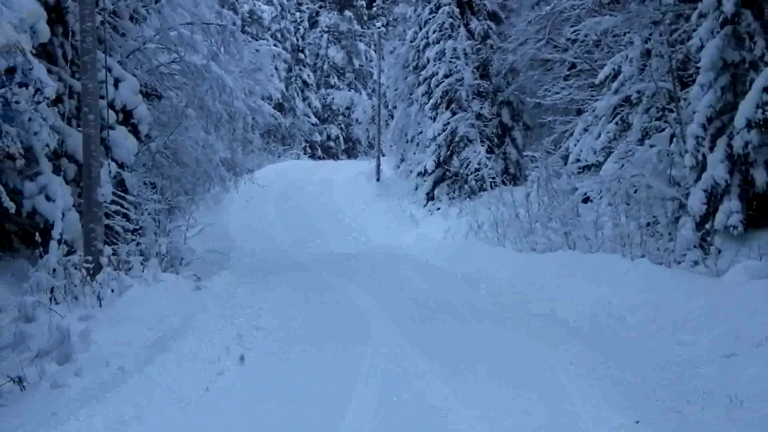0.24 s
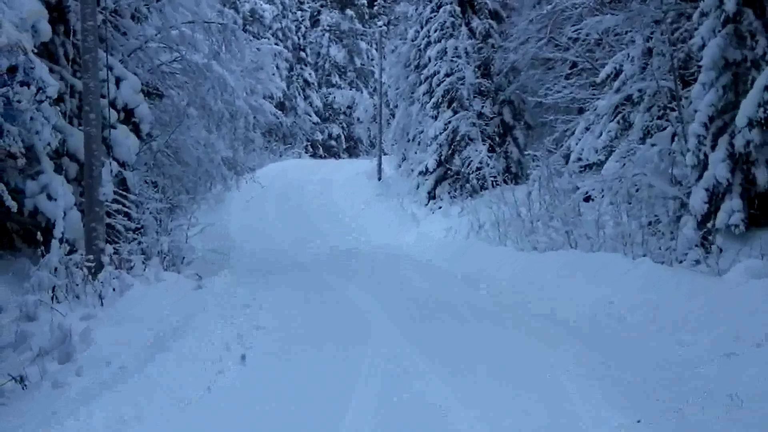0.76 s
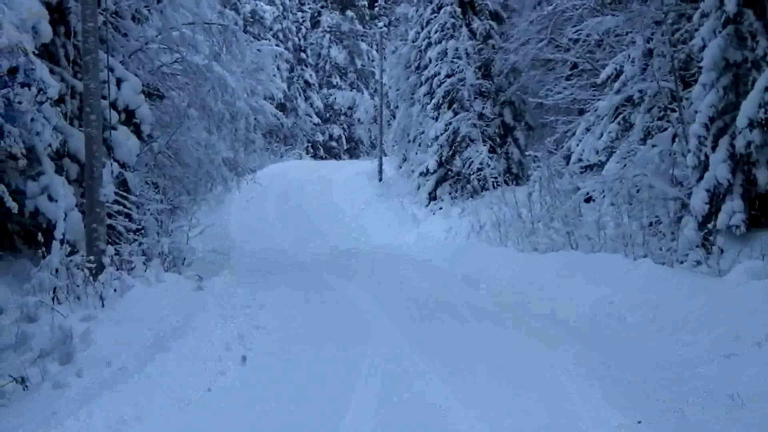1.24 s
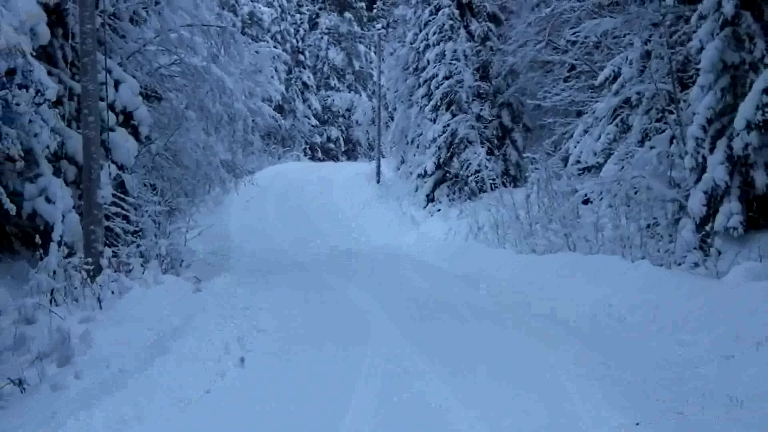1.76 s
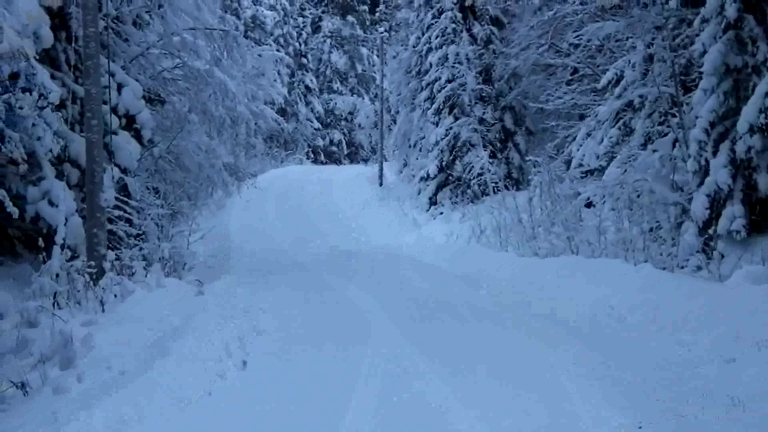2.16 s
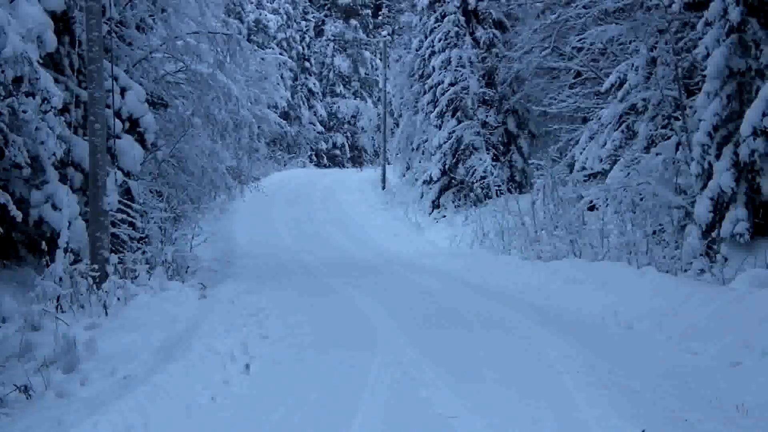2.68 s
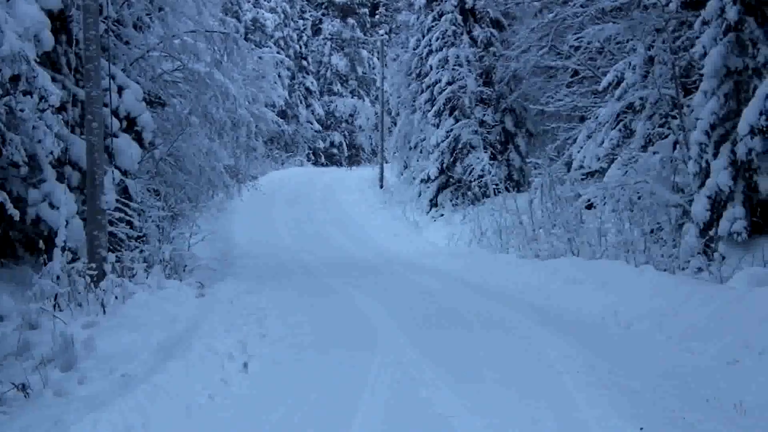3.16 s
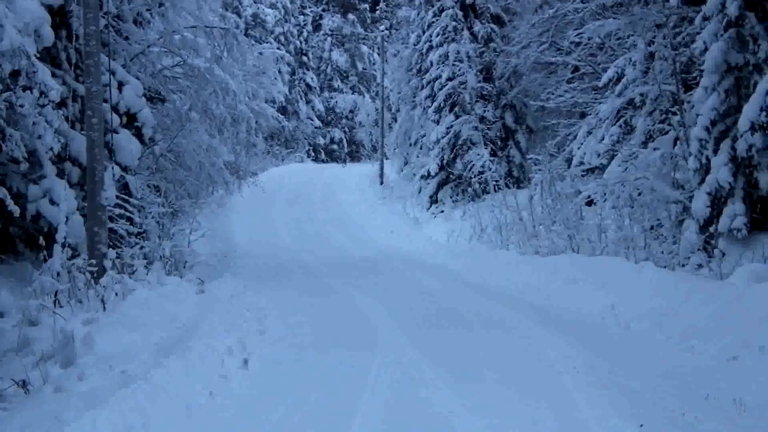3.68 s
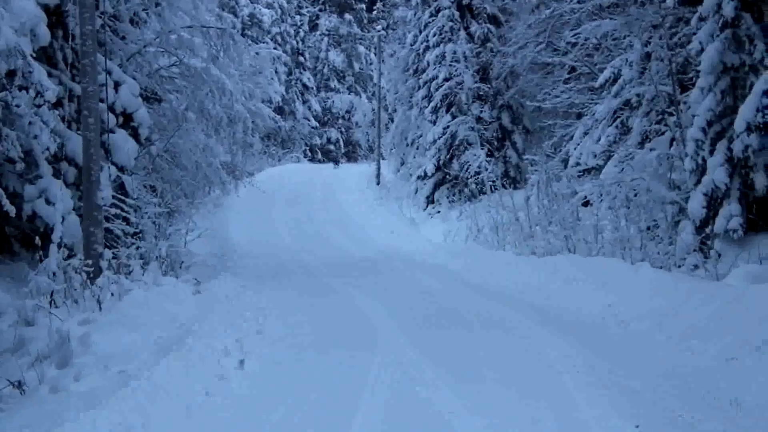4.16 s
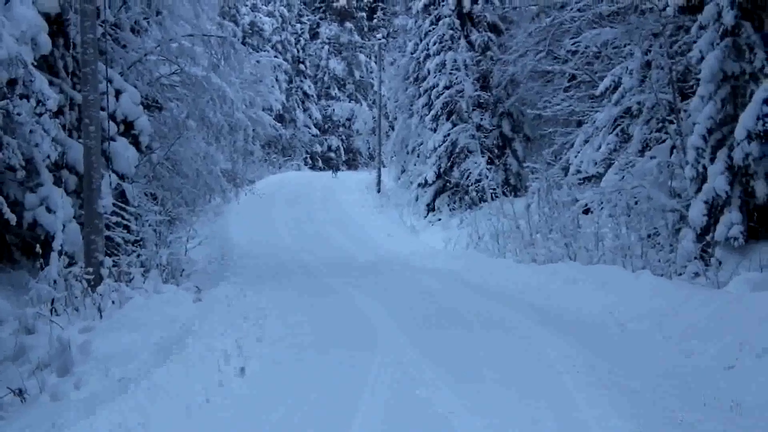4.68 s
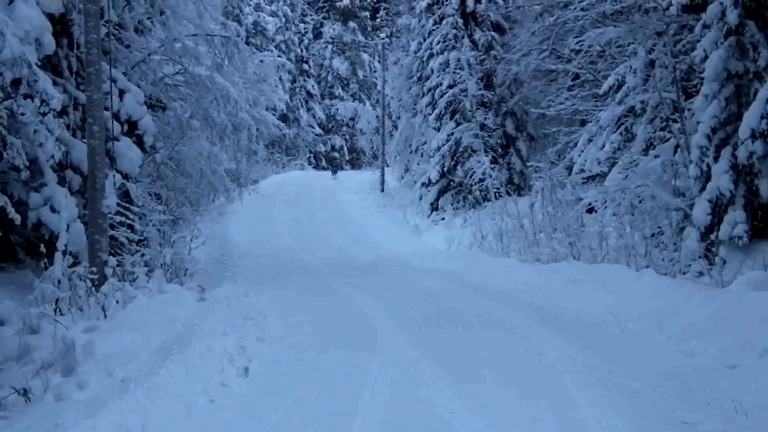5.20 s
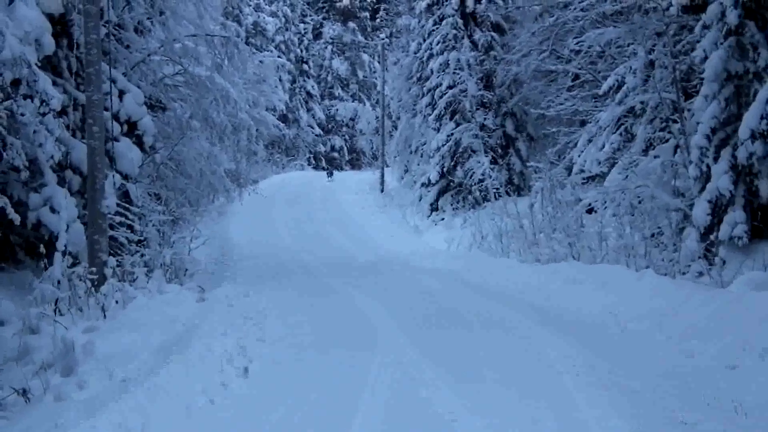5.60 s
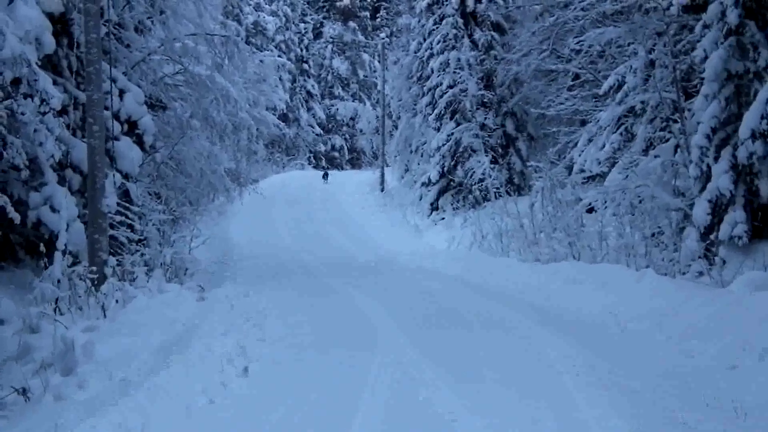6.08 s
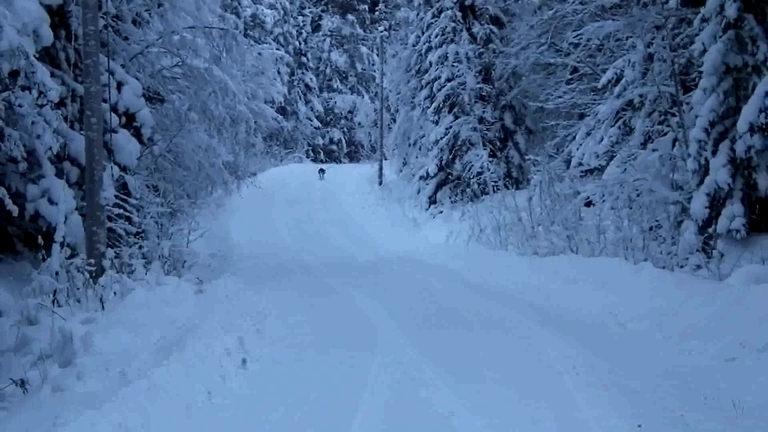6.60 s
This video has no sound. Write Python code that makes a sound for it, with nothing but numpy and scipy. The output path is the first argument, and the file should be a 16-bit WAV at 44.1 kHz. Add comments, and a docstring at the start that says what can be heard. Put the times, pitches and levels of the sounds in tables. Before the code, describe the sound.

Outdoors in still winter woods, a stereo microphone catches low thumping wind, mostly on the left, for half a second. A hound then cries sharply, slightly right of centre: about a tenth of a second per yelp, spaced apart, five before three seconds and four after four seconds, the later ones stronger. Thin squeaky whines and breathy huffs fill some gaps, over quiet hiss, a faint far rush and a dull scattered echo.

```python
"""A hound gives tongue in a forest: seven yelps crack in high and swell on a note, two bays climb and leap.
Its voice is a harmonic stack shaped by the throat; each cry collapses into a rough burst and a huff of shaped noise.
Thin gliding whines slip out between cries, and the trees return sparse echoes and a dull scattered tail.
Low noise and damped thumps make wind on the microphone, strongest at first, with weaker breaths later.
Underneath lie a quiet two-eared hiss, a far rush that comes and goes, and faint, very high electrical pips."""
import sys
import numpy as np
from scipy import signal
from scipy.fft import rfft, irfft, next_fast_len
from scipy.io import wavfile
from scipy.ndimage import uniform_filter1d

SR = 44100
rng = np.random.default_rng(int(sys.argv[2]) if len(sys.argv) > 2 else 0)


def wrap_up_sound(samples):
    """Save the sound to the file named by the first command line argument, as 16-bit audio."""
    columns = np.atleast_2d(samples).T
    # keep every value between -1 and 1, then stretch to whole-number steps
    tamed = np.clip(columns, -1, 1)
    steps = np.round(tamed * 32767).astype(np.int16)
    wavfile.write(sys.argv[1], SR, steps)


N = 301644
TIME = np.arange(N) / SR
CUTOFF_HZ = 15000

# Colour of still forest and microphone hiss: (frequency [Hz], relative level [dB])
HISS_COLOUR = [(20, -6), (130, -2), (330, -1), (500, -2), (1100, -6), (2200, -5), (3000, -7), (6200, -8),
               (7300, -14), (8000, -29), (9200, -27), (10300, -13), (11500, -22), (14500, -19)]
# Left-right likeness of the hiss: (frequency [Hz], correlation [0-1])
HISS_LIKENESS = [(60, .05), (290, 0.25), (700, 0.35), (1500, 0.028), (14000, 0.033)]
# Slow fade of the hiss, before the stereo spread: (time [s], level [dB])
HISS_FADE = [(0, -43), (.9, -45.5), (6.8, -48.5)]
# A low, far rush that comes and goes, before each ear's trim: (time [s], level [dB])
RUSH_SWELLS = [(0, -63), (2.3, -53), (3.4, -61), (3.65, -51), (4.1, -51), (4.4, -55), (5.4, -58),
               (6.8, -53)]
# Colour of the far rush: (frequency [Hz], relative level [dB])
RUSH_TONE = [(120, -16), (220, 2.5), (340, 2), (480, -15), (900, -4), (3000, -80.5)]

# Colour of wind on the microphone: (frequency [Hz], relative level [dB])
WIND_TONE = [(12, -27.5), (20, 2.5), (54, 1), (91, -6), (163, -7.5), (216, -16), (398, -30), (700, -36),
             (910, -54), (1540, -120)]
# Later breaths of wind, before each ear's trim: (start [s], end [s], level [dB])
WIND_BREATHS = [(.92, 1.703, -48.5), (2.55, 2.727, -35.5), (3.56, 3.62, -50), (4.85, 5.612, -43.5),
                (6.063, 6.21, -42)]
# Strongest buffets, before trim and panning: (time [s], peak level [dB], left minus right [dB])
WIND_BUFFETS = [(0.076, -16.5, 16), (0.188, -16, 27), (0.307, -15.5, 28), (0.408, -16.5, 31),
                (0.542, -14.5, 28), (0.637, -21, 21), (0.92, -25, 20), (2.531, -29.5, 28), (2.636, -24, 23),
                (4.867, -26, 22)]
# The opening gust blows, then dies away; levels before each ear's trim
GUST_DB, GUST_END_S, GUST_DIES_DB_PER_S = -29.5, 0.54, 104
CALM_DB, BREATH_RISE_S, BREATH_FALL_S = -54.5, 0.14, 0.11

# Echoes from the edge of the trees, before dulling: (delay [s], level [dB])
TREE_ECHOES = [(.034, -16), (.066, -22.5), (.15, -34), (0.202, -36)]

# Thin whines, gliding through three pitches:
# (start [s], end [s], first pitch [Hz], middle pitch [Hz], last pitch [Hz], base level [dB])
WHINE_GLIDES = [(4.04, 4.079, 3180, 3860, 4840, -42.5), (4.344, 4.402, 2930, 2770, 2810, -50.5),
                (4.615, 4.639, 3300, 3870, 4840, -42.5), (3.21, 3.252, 6200, 6000, 5850, -51),
                (5.10, 5.175, 3180, 3020, 3230, -50.5), (5.193, 5.216, 3400, 4280, 5140, -39),
                (6.137, 6.181, 2710, 3310, 3970, -38.5), (6.194, 6.201, 3880, 3560, 3200, -37),
                (6.578, 6.642, 3260, 2980, 3340, -47.5), (6.647, 6.674, 3080, 3800, 4500, -41)]
# Huffs without voice: (peak time [s], rise [s], fall [s], level [dB])
VOICELESS_HUFFS = [(5.76, 0.05, 0.058, -36.5), (6.219, 0.0045, 0.016, -33), (6.265, 0.002, 0.011, -41),
                   (6.335, 0.014, 0.041, -41.5)]
# Colour of air rushing through the mouth: (frequency [Hz], relative level [dB])
BREATH_COLOUR = [(300, -49), (600, 2), (1000, 2.5), (1600, 7), (2300, 7), (3000, -13), (4600, -6),
                 (6600, -18), (8000, -31.5), (14000, -32)]
# Resonances of throat and open mouth: (frequency [Hz], relative gain [dB])
THROAT_GAIN = [(300, -40), (600, 7), (1000, 3.5), (1450, 11.5), (2150, 5.5), (2500, 8), (2900, -22.5),
               (3600, -31.5), (4450, -18.5), (5300, -27.5), (6200, -35.5), (7300, -37.5), (8200, -85.5)]
# The folds lock into a slower pattern and add an in-between tone:
# (start [s], end [s], multiple of pitch [ratio], level re voice [dB])
FOLD_SPLITS = [(2.031, 2.062, 2 / 3, -12), (2.614, 2.624, 2 / 3, -20), (4.075, 4.124, 3 / 2, -12.5),
               (4.725, 4.737, 3 / 2, -4.5)]

# Yelps crack in high, settle on a note, strain upward until the voice catches, then collapse:
# (start [s], note length [s], catch length [s], lag of last burst behind plunge [s],
#  settling time [s], straining time [s], onset pitch [Hz], held pitch [Hz], strained pitch [Hz],
#  crack level [dB], note level [dB], swell depth [dB], last burst level [dB], overtone level [dB],
#  huff level [dB], throat lift near 3 kHz [dB], throat lift near 4.6 kHz [dB], hoarseness [0-1])
YELP_CRIES = [(.609, 0.072, 0.0027, 0.00086, .005, 0.019, 1770, 1578, 1713, -22, -14.5, 30, -16, -39.5, -35, 1, -7, 0.3),
              (1.202, .069, 0.024, 0.00021, 0.016, .010, 2204, 1379, 1550, -19, -12, 23.5, -16.5, -26.5, -34.5, 13, -3, 0.1),
              (1.995, 0.086, 0.016, -0.0033, 0.012, 0.016, 2046, 1319, 1628, -23, -19.5, 15, -12.5, -24.5, -33, 12, 2, 0.17),
              (2.571, 0.072, 0.03, -0.0018, 0.013, 0.01, 2303, 1476, 1664, -22, -14, 24, -9, -28.5, -35, 2, -0.5, 0.15),
              (4.088, .103, .000, .006, .007, 0.0258, 1963, 1380, 1466, -15, -7, 18, -15.5, -20.5, -28, -6.5, 2.5, 0.13),
              (5.228, .088, 0.0087, -0.0013, .014, .014, 2405, 1514, 1661, -13.5, -13.5, 16, -9.5, -22, -25.5, 6, 5, 0.76),
              (6.683, .086, .010, 0.0006, .017, 0.01084, 2316, 1529, 1750, -15, -14, 2.5, -11.5, -23.5, -24.5, -2, -23, 0.47)]
# Bays climb from low to a first note, leap to a second, then collapse:
# (start [s], length to leap [s], length after leap [s],
#  onset pitch [Hz], first pitch [Hz], leap pitch [Hz], end pitch [Hz],
#  onset level [dB], first note level [dB], second note level [dB], last burst level [dB],
#  overtone level [dB], huff level [dB], second note roughness [0-1],
#  throat lift near 3 kHz [dB], throat lift near 4.6 kHz [dB], hoarseness [0-1])
BAY_CRIES = [(1.466, .081, .060, 566, 1071, 1188, 1132, -32.5, -6.5, -22, -12.5, -34.5, -36, 0.2, 5.5, -9, 0.2),
             (4.649, .059, .062, 932, 1256, 1406, 1457, -23.5, -11, -13, -15, -26.5, -30, 0.02, -11.5, -3.5, 0.2)]

ATTACK_S, ATTACK_DB = 0.019, 8   # a yelp's note comes in over this time, from this far down
CRACK_AT_S, CRACK_WIDTH_S, CRACK_ROUGH = .011, 0.0076, 0.48   # the rough first instant
SWELL_CURVE = 2.9   # the swell is quick at first and levels off
RELEASE_S, CATCH_DB, CATCH_ROUGH = 0.0072, 13.5, 0.72   # the note chokes off by CATCH_DB
HELD_ROUGH = 0.041   # roughness of a held note
CATCH_ROUGHENS_S, CATCH_CLEARS_S = 0.0041, .06   # rough almost at once, clearing slowly
YELP_DULL_DB = 12.5   # at full roughness, a yelp's partials lose this much an octave

CLIMB_SHARE, CLIMB_ROUGH = .66, 0.27   # share of time to leap spent climbing; added roughness at foot
BAY_ATTACK_DB = 3.5   # a bay comes in from this far down
BEND_HZ = 44.9   # the second note arches up by this much
# At this share of the time to the leap the voice opens, this fast, by this share of its swell
OPEN_AT, OPEN_S, OPEN_SHARE = 0.37, .007, 0.57
LEAP_S, SAG_DB, BAY_BURST_LAG_S, BAY_ARCH_DB = 0.0085, 5.5, 0.0037, 5

# Overtones top out at this share of a cry; a yelp's weaken by this much at its start
OVERTONES_PEAK, OVERTONES_ARCH_DB = 0.64, 11.5
# Share of the voice's swing that overtones follow; their loss as the collapse nears
OVERTONES_FOLLOW, OVERTONES_SLACK_DB = 0.56, 5

# Every cry ends alike: the folds go slack in a last rough burst, and a huff of air follows
COLLAPSE_S, SLACK_HZ, COLLAPSE_ROUGH = .022, 604.7, 1
PLUNGE_CURVE, PLUNGE_DB = 1.4, -18.5   # steepest at its start; level re the burst
BURST_RISE_S, BURST_FALL_S = 0.0042, 0.0044
HUFF_LAG_S, HUFF_RISE_S, HUFF_FALL_S = 0.021, 0.011, 0.037


def from_db(db):
    """Decibels to gain."""
    return 10 ** (np.asarray(db) / 20)


def rms_one(x):
    """Scale to unit rms."""
    return x / np.sqrt(np.mean(x ** 2) + 1e-20)


def at_hz(points, hz):
    """Read a spectrum on a log-frequency axis."""
    f, value = np.transpose(points)
    return np.interp(np.log(np.maximum(hz, 1)), np.log(f), value)


def noise(colour, size=N):
    """Noise of a given spectrum, rms 1."""
    padded = next_fast_len(size)
    gain = from_db(at_hz(colour, np.fft.rfftfreq(padded, 1 / SR)))
    white = rng.standard_normal(padded)
    return rms_one(irfft(rfft(white) * gain, padded)[:size])


def butter_filter(x, order, hz, kind="low"):
    """Filter with a smooth passband."""
    return signal.sosfilt(signal.butter(order, hz, kind, fs=SR, output="sos"), x)


def band_pass(x, low_hz, high_hz):
    """Keep one band, with steep sides."""
    return butter_filter(x, 4, [low_hz, high_hz], "band")


def wobble(low_hz, high_hz, size):
    """Random motion within a range of rates, spread 1."""
    white = rng.standard_normal(size + SR // 4)   # the lead-in lets the filter settle
    return rms_one(butter_filter(white, 2, [low_hz, high_hz], "band")[-size:])


def ramp(t, start, length):
    """Rise from 0 to 1 over a stretch of time."""
    return np.clip((t - start) / length, 0, 1)


def puff(t, peak, rise, fall):
    """A quick swell to 1, then an exponential decay."""
    decay = np.where(t < peak, ((t - peak) / rise) ** 2, (t - peak) / fall)
    return np.exp(-np.minimum(decay, 30))


def pips():
    """Faint electrical interference: a very high pip about four times a second."""
    on = (TIME - .2315) % .2502 < .015
    tone = from_db(-55) * np.sin(2 * np.pi * 11950 * TIME)
    return uniform_filter1d(on * 1.0, size=60) * tone   # softened edges


def still_air(left_db=-1.0, right_db=.5):
    """A far rush shared by both ears, under hiss that is mostly each ear's own."""
    alike = np.clip(at_hz(HISS_LIKENESS, np.fft.rfftfreq(N, 1 / SR)), 0, 1)
    mid = irfft(rfft(noise(HISS_COLOUR)) * np.sqrt(1 + alike), N)
    side = irfft(rfft(noise(HISS_COLOUR)) * np.sqrt(1 - alike), N)
    hiss = from_db(np.interp(TIME, *np.transpose(HISS_FADE))) * np.array([mid + side, mid - side])
    rush = from_db(np.interp(TIME, *np.transpose(RUSH_SWELLS))) * noise(RUSH_TONE)
    return (hiss + rush) * from_db([[left_db], [right_db]])


def wind(gust_db=(4.5, -9), lull_db=(-1, -3), lumps_db=3):
    """Eddies hit each port separately as lumpy low noise; the opening gust comes from the left."""
    gust = from_db(GUST_DB - GUST_DIES_DB_PER_S * np.maximum(TIME - GUST_END_S, 0))
    lull = from_db(CALM_DB)
    for start, end, db in WIND_BREATHS:
        rise = np.minimum(TIME - start, 0) / BREATH_RISE_S
        fall = np.maximum(TIME - end, 0) / BREATH_FALL_S
        lull = lull + from_db(db) * np.exp(rise - fall)
    eddies = np.array([rms_one(noise(WIND_TONE) * from_db(lumps_db * wobble(5.7, 25, N)))
                       for ear in range(2)])
    slow_eddies = rms_one(butter_filter(eddies, 2, 110))
    opening = gust * eddies * from_db(gust_db)[:, None]
    return opening + lull * slow_eddies * from_db(lull_db)[:, None]


def buffets(low_hz=55, high_hz=105, length_s=0.0043, gain_db=-3):
    """An eddy bursting on a port pushes the membrane to and fro once or twice."""
    out = np.zeros((2, N))
    rates = rng.uniform(low_hz, high_hz, len(WIND_BUFFETS))
    for (peak_s, db, pan_db), hz in zip(WIND_BUFFETS, rates):
        age = np.clip(TIME - peak_s + length_s, 0, .3)
        swell = age / length_s * np.exp(1 - age / length_s)
        push = swell * np.sin(2 * np.pi * hz * age)
        sides = from_db(np.array([[pan_db], [-pan_db]]) / 2)
        out += from_db(db + gain_db) * push * sides / sides.mean()
    return out


def forest(x, scatter_db=-24, t60=1.03, dull_hz=1900, build_s=0.06):
    """Trunks scatter a thin, dull tail, different at each ear; the edge of the trees adds distinct echoes."""
    t = TIME[:SR]
    # about 1500 random reflections a second
    trunks = rng.standard_normal((2, SR)) * (rng.random((2, SR)) < 1500 / SR)
    tail = trunks * from_db(-60 * t / t60) * (1 - np.exp(-t / build_s))
    response = from_db(scatter_db) * tail / np.sqrt((tail ** 2).sum(1, keepdims=True))
    for delay, db in TREE_ECHOES:
        arrival = ((delay + rng.uniform(0, .0003, 2)) * SR).astype(int)   # slightly apart at the ears
        response[[0, 1], arrival] += from_db(db)
    response = butter_filter(response, 2, dull_hz)
    return signal.fftconvolve(x[None], response, axes=1)[:, :N]


def whines(octave_db=-6, jitter=.01, flicker_db=3):
    """Tightly stretched folds whistle a short glide with a weak octave."""
    out = np.zeros(N)
    for start, end, first_hz, middle_hz, last_hz, db in WHINE_GLIDES:
        span = (TIME > start) & (TIME < end)
        u = np.linspace(0, 1, span.sum())
        glide = np.polyfit([0, .5, 1], [first_hz, middle_hz, last_hz], 2)
        pitch = np.polyval(glide, u)
        phase = 2 * np.pi * np.cumsum(pitch * (1 + jitter * wobble(40, 370, len(u)))) / SR
        octave = from_db(octave_db) / (1 + (pitch / 3600) ** 20)   # gone on the highest notes
        level = from_db(db + flicker_db * wobble(60, 80, len(u)))
        swell = np.sqrt(2 * np.abs(np.sin(np.pi * u)))
        out[span] += level * swell * (np.sin(phase) + octave * np.sin(2 * phase))
    return out


def huffs(after_cries, grain=0.31):
    """Air pushed out after each cry and in the pauses: a quick swell, then a grainy decay."""
    level = after_cries
    for peak_s, rise, fall, db in VOICELESS_HUFFS:
        level = level + from_db(db) * puff(TIME, peak_s, rise, fall)
    return level * rms_one(noise(BREATH_COLOUR) * np.exp(grain * wobble(73, 200, N)))


def huff_after(end, huff_db):
    """Level of the air let out once the folds begin to go slack."""
    return from_db(huff_db) * puff(TIME, end + HUFF_LAG_S, HUFF_RISE_S, HUFF_FALL_S)


def overtones(phase, strength, hoarse, flicker_db=6, smear=0.25, hiss_share=0.29):
    """Partials above the main mouth resonance; hoarseness makes each flicker, smear and give way to hiss."""
    size = len(phase)
    k = np.arange(1, len(strength) + 1)[:, None]
    flicker = np.array([wobble(7.3, 59, size) for row in k])
    strength = strength * from_db(flicker_db * np.sqrt(hoarse) * flicker)
    stray = np.array([wobble(51, 350, size) for row in k])
    stray = smear * hoarse * stray * (k - 1)   # higher partials stray further
    tones = (strength * np.sin(k * phase + stray)).sum(0) / np.sqrt((strength ** 2).sum(0) / 2)
    hiss = rms_one(butter_filter(noise(BREATH_COLOUR, size), 4, 3300, "high"))
    share = np.clip(hiss_share * hoarse, 0, .9)
    return np.sqrt(1 - share) * tones + np.sqrt(share) * hiss


def overtone_level(t, start, end, peak_db, depth_db, level_db):
    """Overtones in dB re the voice: they top out past mid-cry, partly follow its loudness, and sag at its end."""
    arch_db = -depth_db * (((t - start) / (end - start) - OVERTONES_PEAK) / OVERTONES_PEAK) ** 2
    follow_db = OVERTONES_FOLLOW * (level_db - level_db.max())
    slack_db = OVERTONES_SLACK_DB * ramp(t, end - RELEASE_S, RELEASE_S)
    return peak_db + arch_db + follow_db - slack_db - level_db


def cry(t, pitch, level_db, bright_db, rough, lift_db, high_lift_db, hoarse, jitter=0.1,
        steady_jitter=0.0013, flutter=0.81, chop_hz=310, rasp_db=-11, mouth_hz=2700, edge_s=.002,
        rough_dull_db=3.5):
    """Folds sound a harmonic stack through the throat; roughness shakes rate and strength and lets air through."""
    size = len(t)
    span = (TIME >= t[0]) & (TIME <= t[-1])
    rough = np.clip(rough, 0, 1)
    shaken = pitch * (1 + (steady_jitter + jitter * rough) * wobble(38, 500, size))
    phase = 2 * np.pi * np.cumsum(shaken) / SR

    k = np.arange(1, 13)[:, None]
    hz = k * pitch
    lifts = lift_db * np.exp(-((hz - 3000) / 450) ** 2)
    lifts = lifts + high_lift_db * np.exp(-((hz - 4550) / 550) ** 2)
    dull_db = rough_dull_db * rough * np.log2(k)
    strength = from_db(at_hz(THROAT_GAIN, hz) + lifts - dull_db) * (hz < CUTOFF_HZ)

    # the main mouth resonance carries the level of the cry
    in_body = 1 / (1 + (hz / mouth_hz) ** 40)
    low = strength * in_body
    body = (low * np.sin(k * phase)).sum(0) / np.sqrt((low ** 2).sum(0) / 2)
    for start, end, multiple, split_db in FOLD_SPLITS:
        swell = np.sin(np.pi * ramp(t, start, end - start))
        body = body + from_db(split_db) * swell * np.sqrt(2) * np.sin(multiple * phase)
    rasp = rms_one(band_pass(rng.standard_normal(size), 1284, 1835))
    body = body + from_db(rasp_db) * rough * rasp
    upper = overtones(phase, strength * (1 - in_body), np.clip(hoarse + rough, 0, 1))

    # loose throat tissue chops the rough parts a few hundred times a second
    chop_rate = chop_hz * (1 + 0.36 * wobble(13.6, 150, size))
    chop = np.sin(2 * np.pi * np.cumsum(chop_rate) / SR)
    depth = flutter * rough * np.minimum(pitch / 1600, 1)   # slack folds are chopped less
    fade = np.clip(np.minimum(t - t[0], t[-1] - t) / edge_s, 0, 1)
    envelope = from_db(level_db) * fade * (1 + depth * chop) / np.sqrt(1 + depth ** 2 / 2)
    out = np.zeros(N)
    out[span] = band_pass(body * envelope, 555, 2900) + from_db(bright_db) * upper * envelope
    return out


def collapse(t, at, pitch, level, rough, burst_db, burst_lag_s):
    """A last burst, then slack folds plunge in pitch and turn rough; gives pitch, level in dB and roughness."""
    slack = ramp(t, at, COLLAPSE_S)
    burst = puff(t, at + burst_lag_s, BURST_RISE_S, BURST_FALL_S)
    burst = burst + from_db(PLUNGE_DB) * np.sin(np.pi * slack ** 2)
    level_db = 20 * np.log10(np.hypot(level * (1 - slack), from_db(burst_db) * burst) + 1e-9)
    plunge = 1 - (1 - slack) ** PLUNGE_CURVE
    fallen_pitch = pitch * (SLACK_HZ / pitch) ** plunge
    return fallen_pitch, level_db, rough + (COLLAPSE_ROUGH - rough) * ramp(t, at, COLLAPSE_S / 2)


def bay(start, first_s, second_s, onset_hz, first_hz, leap_hz, end_hz, onset_db, first_db, second_db,
        burst_db, overtones_db, huff_db, second_rough, *throat):
    """The folds climb, leap to a higher register and collapse; gives the voice and its huff's level."""
    leap, end = start + first_s, start + first_s + second_s
    t = TIME[(TIME > start) & (TIME < end + COLLAPSE_S)]
    climb = np.sin(np.pi / 2 * ramp(t, start, CLIMB_SHARE * first_s)) ** 2
    leapt, held = ramp(t, leap - LEAP_S / 2, LEAP_S), ramp(t, leap, second_s)

    first_pitch = onset_hz + (first_hz - onset_hz) * climb
    second_pitch = leap_hz + (end_hz - leap_hz) * held + BEND_HZ * np.sin(np.pi * held)
    pitch = (1 - leapt) * first_pitch + leapt * second_pitch

    opened = (1 - OPEN_SHARE) * ramp(t, start, first_s)
    opened = opened + OPEN_SHARE * ramp(t, start + OPEN_AT * first_s, OPEN_S)
    attack_db = BAY_ATTACK_DB * (1 - ramp(t, start, ATTACK_S))
    first_level_db = onset_db + (first_db - onset_db) * opened - attack_db
    level = from_db((1 - leapt) * first_level_db + leapt * (second_db - SAG_DB * held))

    first_rough = HELD_ROUGH + CLIMB_ROUGH * (1 - climb ** 2)
    rough = (1 - leapt) * first_rough + leapt * second_rough
    pitch, level_db, rough = collapse(t, end, pitch, level, rough, burst_db, BAY_BURST_LAG_S)
    bright_db = overtone_level(t, start, end, overtones_db, BAY_ARCH_DB, level_db)
    return cry(t, pitch, level_db, bright_db, rough, *throat), huff_after(end, huff_db)


def yelp(start, note_s, catch_s, burst_lag_s, settle_s, strain_s, onset_hz, held_hz, strained_hz,
         crack_db, note_db, swell_db, burst_db, overtones_db, huff_db, *throat):
    """The folds crack, settle, strain, catch and collapse; gives the voice and its huff's level."""
    catch, end = start + note_s, start + note_s + catch_s
    t = TIME[(TIME > start) & (TIME < end + COLLAPSE_S)]
    settling = (onset_hz - held_hz) * np.exp(-(t - start) / settle_s)
    straining = (strained_hz - held_hz) * np.exp(-np.abs(t - catch) / strain_s)
    pitch = held_hz + settling + straining

    attack_db = ATTACK_DB * (1 - ramp(t, start, ATTACK_S))
    below_swell_db = swell_db * (1 - ramp(t, start, note_s)) ** SWELL_CURVE
    choke_db = CATCH_DB * ramp(t, catch - RELEASE_S, RELEASE_S)
    note = from_db(note_db - attack_db - below_swell_db - choke_db)
    crack = from_db(crack_db) * puff(t, start + CRACK_AT_S, CRACK_WIDTH_S, CRACK_WIDTH_S)

    crack_rough = CRACK_ROUGH * (1 - ramp(t, start + CRACK_AT_S, CRACK_WIDTH_S))
    catch_rough = CATCH_ROUGH * puff(t, catch, CATCH_ROUGHENS_S, CATCH_CLEARS_S)
    rough = HELD_ROUGH + crack_rough + catch_rough
    level = np.hypot(note, crack)
    pitch, level_db, rough = collapse(t, end, pitch, level, rough, burst_db, burst_lag_s)
    bright_db = overtone_level(t, start, end, overtones_db, OVERTONES_ARCH_DB, level_db)
    voice = cry(t, pitch, level_db, bright_db, rough, *throat, rough_dull_db=YELP_DULL_DB)
    return voice, huff_after(end, huff_db)


def scene(left_db=-3.0, right_db=-0.36):
    """The hound is ahead and slightly to the right, amid forest echo, wind, still air and pips."""
    cries = [yelp(*row) for row in YELP_CRIES] + [bay(*row) for row in BAY_CRIES]
    voice, air_after = np.sum(cries, axis=0)
    hound = voice + huffs(air_after) + whines()
    # louder on the right, and one sample later there
    direct = np.array([from_db(left_db) * hound, from_db(right_db) * np.roll(hound, 1)])
    return direct + forest(hound) + wind() + buffets() + still_air() + pips()


def record(dry):
    """The deepest rumble is rolled off and the top is cut steeply."""
    thinned = butter_filter(dry, 1, 22, "high")
    return signal.sosfilt(signal.ellip(10, .2, 80, CUTOFF_HZ, fs=SR, output="sos"), thinned)


dry = scene()
out = record(dry)
wrap_up_sound(out)
```